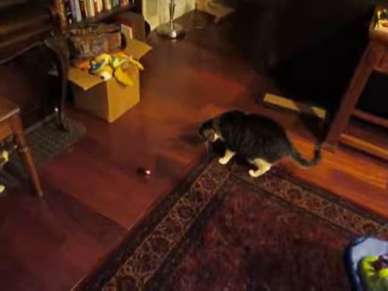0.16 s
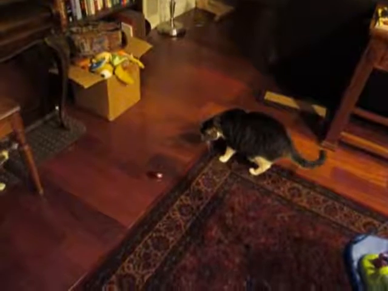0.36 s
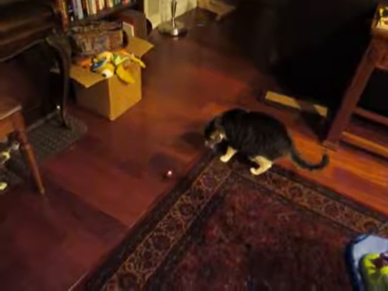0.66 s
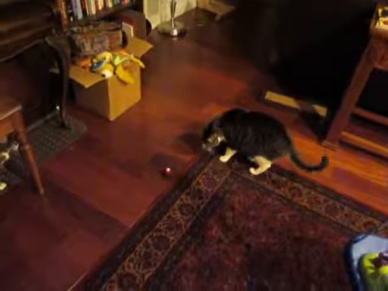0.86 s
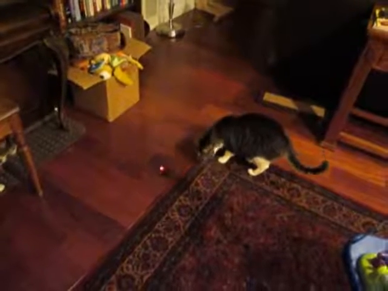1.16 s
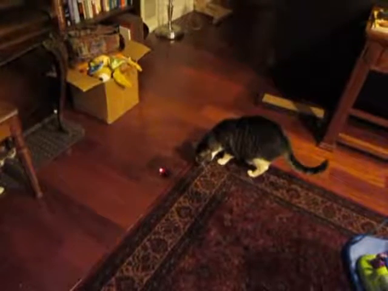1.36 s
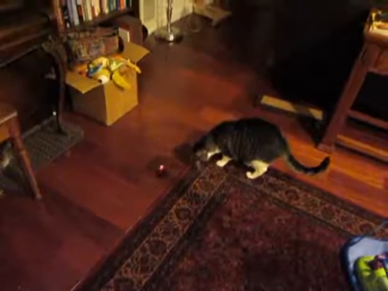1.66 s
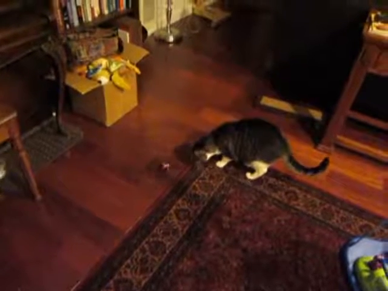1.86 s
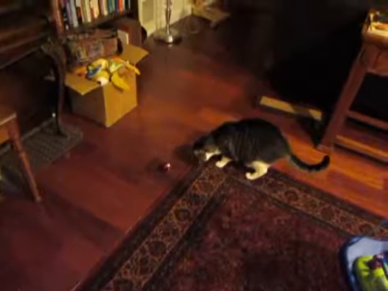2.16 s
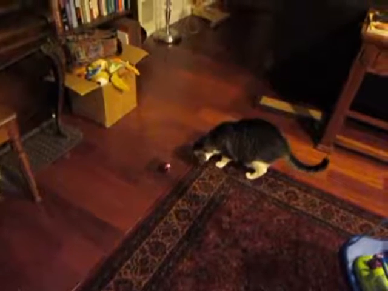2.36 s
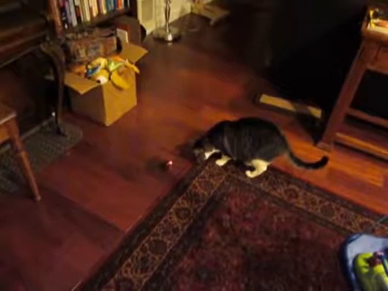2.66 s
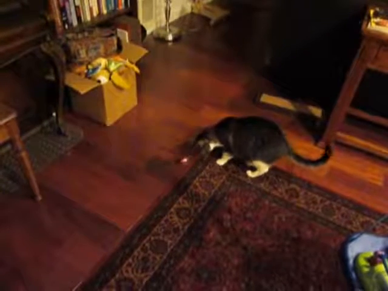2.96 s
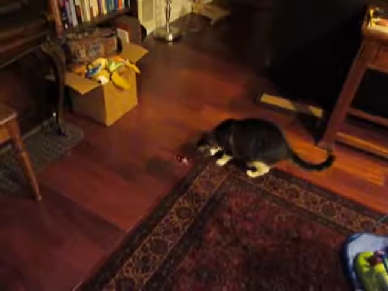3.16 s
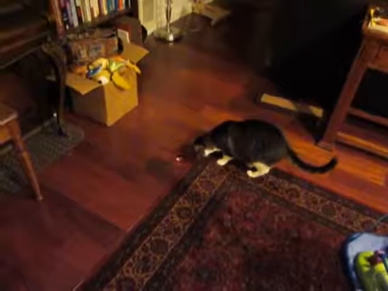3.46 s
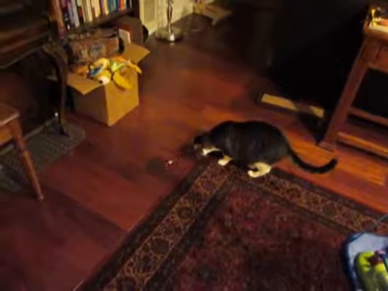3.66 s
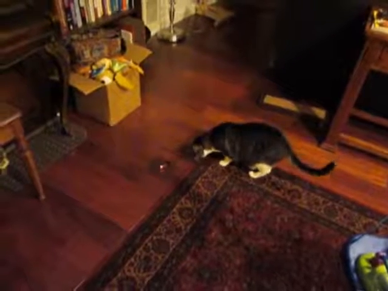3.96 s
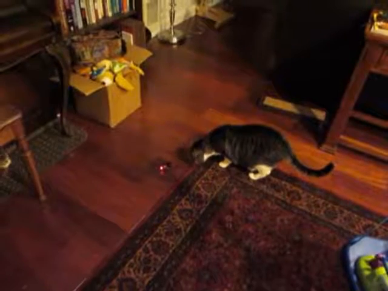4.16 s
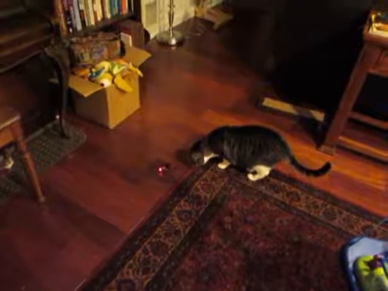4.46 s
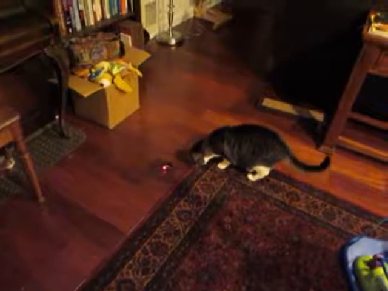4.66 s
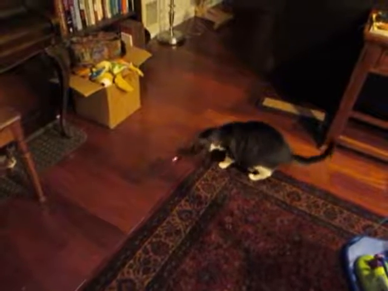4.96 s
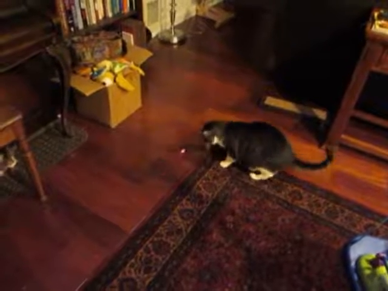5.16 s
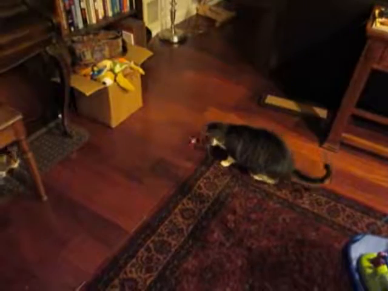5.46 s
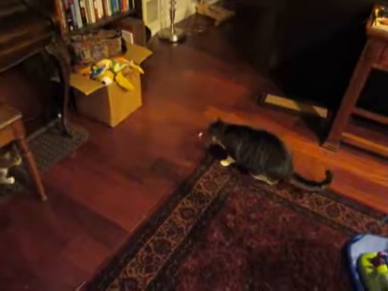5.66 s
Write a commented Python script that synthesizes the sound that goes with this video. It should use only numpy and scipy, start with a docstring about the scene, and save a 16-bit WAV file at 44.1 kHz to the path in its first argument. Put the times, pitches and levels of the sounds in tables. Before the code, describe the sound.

Stop-and-go whirring of a small plastic toy on floorboards indoors, gritty gear buzz with snaps and a steady whine, little clicks between runs.

```python
"""A tiny remote-controlled toy makes four short runs over a wooden floor in a quiet room.
It is already driving at the start; three more runs follow, and the last is still going at the end.
In each run plastic gears rattle and snap in the shell and whine at the rate their teeth meet,
while the wheels drum on the boards. In the pauses the steering clicks against its stop.
Noise taps, sine tones and clicks pass through ringing bodies; echoes, soft air and thin tones lie around them."""
import sys
import numpy as np
from scipy import signal
from scipy.fft import rfft, irfft
from scipy.io import wavfile

SR = 44100
rng = np.random.default_rng(int(sys.argv[2]) if len(sys.argv) > 2 else 0)


def wav_record(signal):
    """Record a signal, one row per channel, as 16-bit PCM in the file named by sys.argv[1]."""
    frames = np.transpose(np.atleast_2d(signal))
    bounded = np.clip(frames, -1, 1)
    # unit amplitude maps onto the largest positive 16-bit level
    quanta = np.round(bounded * 32767).astype(np.int16)
    wavfile.write(sys.argv[1], SR, quanta)


N = 256200
T = np.arange(N) / SR  # time in seconds

# The motor's runs. Each row: switched on in seconds, switched off in seconds, spin-up in seconds,
# gear rattle in dB (before the rattle's overall gain), wheel rumble in dB, treble in dB against the
# rest, depth of the once-a-turn clatter, hollow chassis ring in dB against the rest, stray snaps per second.
RUNS = [ (-0.1, 1.061, 0.028, -32, -51, -10.5, 1.2, -24.5, 7.8),
        (1.444, 1.957, 0.068, -34.4, -50, -7.5, 1.7, -8, 14),
        (2.613, 3.902, .035, -31, -49.5, -10, 0.79, -28.5, 2.6),
        (4.524, 5.9, 0.044, -29.5, -50, -9, 0.27, -22.5, 1.95), ]
# How fast the gear teeth meet. Each row: time in seconds, teeth per second in Hz.
TOOTH_RATE = [(0, 788), (.38, 790), (.46, 815), (.75, 818), (1.1, 823), (2.64, 760), (2.74, 792),
              (3.1, 793), (3.24, 809), (3.6, 794), (3.9, 803), (4.55, 775), (4.63, 825), (4.8, 828),
              (5.05, 821), (5.35, 827), (5.6, 828), (5.81, 819)]
# When the gears sing. Each row: start in seconds, end in seconds, main tone in dB, then in dB against it
# the 2nd harmonic, 3rd harmonic and second gear's tone, then flutter depth, throb in dB.
WHINES = [ (-0.1, .37, -44, -10.5, -2, -27, 0.27, 0.4), (0.433, 1.04, -38.5, -16, -0.5, -37, 0.24, 1.7),
          (2.633, 3.854, -46, -9, 1.5, -15, 0.45, 3.1), (4.526, 5.904, -45.5, -5.5, -0.5, -7.5, 0.34, 2.6),
          ]
# How the shell answers a tooth. Each row: frequency in Hz, relative strength in dB.
SHELL = [(400, -23.5), (950, -6.5), (1250, -8), (1500, -11), (1900, -10), (2150, -6.5), (2450, 3),
         (3000, 2), (3750, 2), (4250, -6), (5100, -10), (6100, -19.5), (7200, -24.5), (8600, -32.5),
         (9600, -47)]
# How the boards answer a wheel. Each row: frequency in Hz, relative strength in dB.
BOARDS = [(60, -39.5), (150, -25), (240, -10.5), (300, -6), (350, 4.5), (410, -2.5), (455, -11.5),
          (495, -5.5), (560, -16), (900, -45)]
# Snaps of a caught tooth at set times. Each row: time in seconds, peak of the first strike in dB.
SET_SNAPS = [(.0525, -15.5), (.293, -19), (.360, -17.5), (.6605, -17), (.7807, -16), (.8325, -17),
             (.9515, -16.5), (1.4687, -26), (1.6197, -18), (1.7723, -19.5), (2.6497, -16), (2.720, -18),
             (2.808, -16), (2.9674, -16.5), (3.1513, -14.5), (4.535, -23), (4.7417, -16.5), (5.249, -18)]
# Seams or dips under the wheels. Each row: time in seconds, drumming in dB, fade in seconds.
BUMPS = [(0.206, -41, 0.061), (.965, -44.5, 0.027), (1.514, -38.5, 0.042), (1.975, -43, 0.014),
         (2.68, -39.5, 0.059), (2.871, -43.5, .02), (3.228, -32, 0.023), (3.565, -42, 0.029),
         (3.935, -38.5, 0.04), (4.615, -42, .02), (4.791, -33, 0.014), (5.25, -33.5, 0.021),
         (5.723, -42, .03)]
# Steering clicks. Each row: time in seconds, level (rms over 5 ms) in dB, ring in Hz,
# ring strength in dB, sharp edge in dB, both against the linkage's own sound.
CLICKS = [(1.1372, -29.5, 2540, 2, -16), (1.302, -32.5, 4140, -1, -6.5), (1.4131, -29, 3350, -5, -28),
          (1.996, -33.5, 2300, 11, -20), (2.025, -32.5, 3600, 2, -9), (2.3623, -32, 4150, 7.5, -1),
          (2.5444, -37.5, 2070, -6, -20), (2.5557, -43, 3550, -5, -12), (2.578, -45, 1250, 5, -20),
          (2.592, -45.5, 1350, 7, -20), (2.603, -45, 1450, 9, -25), (4.238, -50, 3400, 6, -18),
          (4.33, -48, 3660, 8, -23)]
# How the steering linkage answers a touch. Each row: frequency in Hz, relative strength in dB.
LINKAGE = [(200, -15), (700, -8), (1300, -1), (1700, -5), (2100, 0), (2900, -4), (3500, 0), (4400, -10),
           (5300, -19), (7500, -30), (9600, -48)]
# The sharp edge of a click. Each row: frequency in Hz, relative strength in dB.
CLICK_EDGE = [(500, -17), (3000, -24), (4600, 9), (6500, -5), (8300, -11), (9600, -36)]
# First contact, stop and bounce in one click. Each row: delay in seconds (varied a little), force.
TOUCHES = [(0, .55), (.0006, 1), (.0019, .6)]
# Short flares and lulls of the rattle. Each row: middle in seconds, half length in seconds, change in dB.
SWELLS = [(0.09, 0.027, -2), (0.333, 0.0099, -1), (0.437, 0.022, 0.5), (1.015, 0.015, 1.5),
          (1.558, 0.019, 2.5), (1.638, 0.015, 1.5), (2.89, 0.012, 2.5), (2.932, 0.02, -5),
          (3.045, 0.011, 0.5), (3.128, .018, -3), (3.28, 0.0093, 2.5), (4.762, 0.026, -4),
          (5.055, 0.022, 1), (5.25, .02, 1.5), (5.65, 0.061, -4)]
# The gears' contact, one row: spread of the tap forces in dB, share of steady rubbing.
TOOTH_CONTACT = (4.2, .3)
# Colour of the room noise. Each row: frequency in Hz, relative strength in dB per Hz.
AIR = [(20, -7.5), (40, -8), (90, -5), (130, -7), (200, -5.5), (470, -8), (700, -9), (1670, -11.5),
       (2400, -15), (3600, -17), (5400, -22), (7000, -33.5), (8400, -47.5), (9500, -86.5)]
# Faint steady electrical tones. Each row: frequency in Hz, level in dB.
TONES = [(775, -71), (1712, -74), (5706, -73.5), (6293, -77.5)]
# How fast echoes die. Each row: frequency in Hz, time to fall by 60 dB in seconds.
ROOM = [(200, 0.2), (1000, 0.19), (3500, 0.29), (9000, 0.17)]

COAST_DB_PER_S = 170  # the gears run down once the motor is off
WHEEL_COAST_DB_PER_S = 95  # the wheels roll on a little longer
SURGE_DB, SURGE_HZ = 0.5, 30  # the rattle swells and sinks with the uneven load
KICK_DB, KICK_S = 1, 0.044  # the gears rattle harder as they take up the load
WOBBLE = .14  # swing of the meshing phase over one revolution, in radians
WHINE_RISE_S, THROB_HZ = .05, 24  # the tone swells in, then throbs unevenly
BUMP_RISE_S = 0.00796  # a wheel drops into a seam
STRAY_SNAP_DB, STRAY_SPREAD_DB = 11.5, 2.5  # stray snaps: height above the run's rattle setting, spread
AIR_DB = -50  # level of the room noise
EDGE_HZ = 9600  # hardly anything is heard above this


def mesh_turns(waver=.002, waver_hz=30):
    """Counts the teeth passed so far; the speed wavers with the load."""
    teeth_per_s = np.interp(T, *np.transpose(TOOTH_RATE)) * (1 + waver * wander(waver_hz))
    return np.cumsum(teeth_per_s) / SR


def rattle(turns, loose_per_s=400, contact_s=0.0013, gain_db=-2.0, chassis_hz=1120, chassis_t60=0.0055):
    """Every tooth taps the shell with its own force; loose parts tap in between."""
    spread_db, rub = TOOTH_CONTACT
    tooth_taps = np.diff(np.floor(turns), prepend=0) > 0
    taps = tooth_taps | (rng.random(N) < loose_per_s / SR)
    force = taps * amp(spread_db * np.clip(rng.standard_normal(N), -2, 1.6))
    # each tap is a short burst of rebounds, over the rubbing of the axles
    burst_power = signal.lfilter([1], [1, -np.exp(-2 / (contact_s * SR))], force ** 2)
    contact = evened(np.sqrt(burst_power))
    grit = (contact + rub) * rng.standard_normal(N)
    flare = clatter(turns)
    chassis = mode(chassis_hz, chassis_t60)
    highpass = signal.butter(4, 4400, "high", fs=SR, output="sos")
    out = np.zeros(N)
    for start, end, rise_s, db, _, treble_db, depth, hollow_db, _ in RUNS:
        drive = grit * (1 + depth * flare)
        shell = through(drive, ring(SHELL))
        # the way the toy faces sets the treble share of each run
        treble = signal.sosfiltfilt(highpass, shell)
        hollow = through(through(drive, chassis), chassis)
        sound = evened(shell - treble) + amp(treble_db) * evened(treble) + amp(hollow_db) * evened(hollow)
        out += amp(db) * level(start, end, rise_s, COAST_DB_PER_S) * load(start) * sound
    return amp(gain_db) * out


def clatter(turns, count=21):
    """Once a revolution the gear binds and jumps: the rattle flares, then fades."""
    revolution, part = np.divmod(turns / count, 1)
    strength = rng.uniform(.35, 1.4, 400)
    return strength[revolution.astype(int)] * np.exp(-part / .38)


def load(start):
    """How hard the gears rattle: a kick at the start, uneven surges, a few flares and lulls."""
    kick = KICK_DB * np.exp(-np.maximum(T - start, 0) / KICK_S)
    swells = sum(db * np.exp(-((T - s) / half_s) ** 2) for s, half_s, db in SWELLS)
    return amp(kick + swells + SURGE_DB * wander(SURGE_HZ))


def snaps(rebound=0.4, shake_db=-5, shake_s=0.013):
    """A caught tooth lets go and strikes the shell; it rebounds, and loose parts shake for a moment."""
    strikes, shakes, shell = np.zeros(N), np.zeros(N), ring(SHELL)
    rebound_delays = rng.uniform(.0007, .0013, 200)
    fade = np.exp(-T[:1500] / shake_s)
    for (s, db), delay in zip(SET_SNAPS + stray_snaps(), rebound_delays):
        add(strikes, s, amp([db]))
        add(strikes, s + delay, rebound * amp([db]))
        add(shakes, s, amp(db + shake_db) * fade / np.linalg.norm(fade))
    return through(strikes + shakes * rng.standard_normal(N), shell / abs(shell).max())


def stray_snaps(size=40):
    """Further snaps at random times while the motor drives: rows of time in seconds, peak in dB."""
    rows = []
    for start, end, rise_s, db, *_, per_s in RUNS:
        slot = np.arange(size) + rng.random(size)
        spread = rng.uniform(-1, 1, size)
        times = start + rise_s + slot / max(per_s, .1)
        for s, z in zip(times, spread):
            if 0 < s < end:
                rows.append((s, db + STRAY_SNAP_DB + STRAY_SPREAD_DB * z))
    return rows


def whine(turns, flutter_hz=60):
    """The meshing tone, two harmonics and a second gear's tone; the out-of-round gear adds sidebands."""
    phase = 2 * np.pi * turns + WOBBLE * gear_wheel(turns)
    orders = [1, 2, 3, 17 / 19]  # pitches as multiples of the meshing rate
    out, throb = np.zeros(N), wander(THROB_HZ)
    # complex chance shakes both loudness and phase
    shivers = [wander(flutter_hz) + 1j * wander(flutter_hz) for _ in orders]
    for start, end, db, second_db, third_db, second_gear_db, flutter, throb_db in WHINES:
        loudness = amp(db + throb_db * throb) * level(start, end, WHINE_RISE_S, COAST_DB_PER_S)
        gains = [1, amp(second_db), amp(third_db), amp(second_gear_db)]
        for order, shiver, gain in zip(orders, shivers, gains):
            tone = ((1 + flutter * shiver) * np.exp(1j * order * phase)).real
            out += gain * loudness * evened(tone)
    return out


def gear_wheel(turns, count=21):
    """The swing of the out-of-round gear, about 39 revolutions a second."""
    return np.sin(2 * np.pi * turns / count)


def wheels(grain_per_s=900, board_hz=355, uneven_db=2.0, uneven_hz=18, knock_db=0):
    """The wheels drum over the uneven grain of the boards; at a seam they knock and drum harder."""
    grain = rng.standard_normal(N) * (rng.random(N) < grain_per_s / SR)
    rolling = np.zeros(N)
    for start, end, rise_s, _, db, *_ in RUNS:
        rolling += amp(db) * level(start, end, rise_s, WHEEL_COAST_DB_PER_S)
    power = (rolling * amp(uneven_db * wander(uneven_hz))) ** 2
    knocks, knock = np.zeros(N), mode(board_hz, .06)
    for s, db, fade_s in BUMPS:
        rise = np.clip((T - s) / BUMP_RISE_S, 0, 1)
        swell = rise * np.exp(-np.maximum(T - s - BUMP_RISE_S, 0) / fade_s)
        power += (amp(db) * swell) ** 2
        add(knocks, s + BUMP_RISE_S, amp(db + knock_db) * knock / abs(knock).max())
    return np.sqrt(power) * evened(through(grain, ring(BOARDS))) + knocks


def steering():
    """The linkage flips against its stop and bounces; each click brings out one ring of the plastic."""
    out, linkage, edge = np.zeros(N), ring(LINKAGE), ring(CLICK_EDGE)
    for s, db, ring_hz, ring_db, edge_db in CLICKS:
        ringing = through(linkage, mode(ring_hz, .004))[:len(linkage)]
        touch = linkage + amp(edge_db) * edge + amp(ring_db) * ringing / np.linalg.norm(ringing)
        click = np.zeros(len(touch))
        for delay, force in TOUCHES:
            add(click, delay * rng.uniform(.8, 1.2), force * touch)
        # the level counts as if the click's energy filled 5 ms
        add(out, s, amp(db) * np.sqrt(.005 * SR) * click / np.linalg.norm(click))
    return out


def moving_room(x, change_s=.22, count=6):
    """For the toy's changing place, six patterns of reflections fade into each other in turn."""
    distance = abs((T / change_s - np.arange(count)[:, None] + 1) % count - 1)
    shares = np.cos(np.pi / 2 * np.minimum(distance, 1))
    return sum(room(x * share) for share in shares)


def room(x, delay_s=.005, size=22):
    """Sparse reflections of random sign, each band dying at its own speed."""
    taps = np.zeros(SR)
    at = np.arange(round(delay_s * SR), SR - size, size)
    taps[at + rng.integers(0, size, len(at))] = rng.choice([-1, 1], len(at))
    hz, t, bands = signal.stft(taps, SR, nperseg=256)
    decay = np.exp(-np.log(1000) * t / read(ROOM, hz)[:, None])
    tail = signal.istft(bands * decay, SR, nperseg=256)[1]
    return through(x, tail / np.linalg.norm(tail))


def background():
    """Soft room noise, shaped from random noise, with a few thin steady sine tones."""
    air = amp(AIR_DB) * evened(through(rng.standard_normal(N), ring(AIR)))
    return air + sum(amp(db) * evened(np.sin(2 * np.pi * hz * T)) for hz, db in TONES)


def amp(db):
    """Turns dB into a plain factor."""
    return 10 ** (np.asarray(db) / 20)


def evened(x):
    """Scales to rms 1."""
    return x / np.sqrt(np.mean(x ** 2) + 1e-20)


def read(points, hz):
    """Reads between the points of a table, on a log-frequency axis."""
    f, value = np.transpose(points)
    return np.interp(np.log(hz + 1), np.log(f + 1), value)


def level(start, end, rise_s, coast_db_per_s):
    """Rises from start, holds until end, then runs down."""
    return np.clip((T - start) / rise_s, 0, 1) * amp(-coast_db_per_s * np.maximum(T - end, 0))


def add(mix, s, sound):
    """Mixes a sound in at time s."""
    part = mix[max(round(s * SR), 0):][:len(sound)]
    part += sound[:len(part)]


def wander(hz):
    """Smooth chance of rms 1, fading out above about hz."""
    f = np.fft.rfftfreq(N, 1 / SR)
    return evened(irfft(rfft(rng.standard_normal(N)) * np.exp(-(f / hz) ** 2), N))


def ring(spectrum, size=4096):
    """How a body with this spectrum sounds when struck once: starts at once, energy 1."""
    log_gain = np.log(amp(read(spectrum, abs(np.fft.fftfreq(size, 1 / SR)))))
    # the Hilbert transform gives the phase that puts the energy as early as possible
    response = np.fft.ifft(np.exp(np.conj(signal.hilbert(log_gain)))).real[:size // 2]
    return response / np.linalg.norm(response)


def through(x, response):
    """Passes a sound through a body with this impulse response."""
    return signal.oaconvolve(x, response)[:N]


def mode(hz, t60, size=2048):
    """One dying resonance, energy 1; t60 is the seconds it takes to fall by 60 dB."""
    wave = np.sin(2 * np.pi * hz * T[:size]) * np.exp(-np.log(1000) * T[:size] / t60)
    return wave / np.linalg.norm(wave)


def scene(toy_room_db=-8, whine_room_db=-22, click_room_db=-10):
    """The toy and its steering with their echoes, over the quiet room."""
    turns = mesh_turns()
    toy = rattle(turns) + snaps() + wheels()
    tone, clicks = whine(turns), steering()
    echo = moving_room(amp(toy_room_db) * toy + amp(whine_room_db) * tone + amp(click_room_db) * clicks)
    return (toy + tone + clicks + echo + background())[None]


def record(dry):
    """A steep low-pass filter takes away the highest treble."""
    lowpass = signal.firwin(511, EDGE_HZ, window=("kaiser", 9), fs=SR)
    return signal.oaconvolve(dry, lowpass[None], "same")


dry = scene()
out = record(dry)
wav_record(out)
```